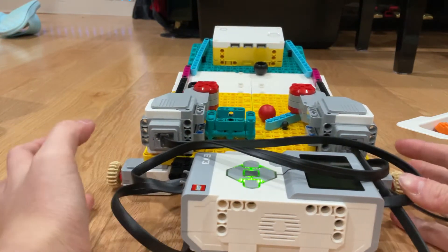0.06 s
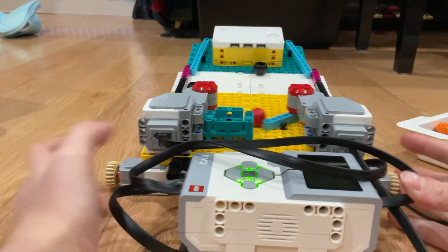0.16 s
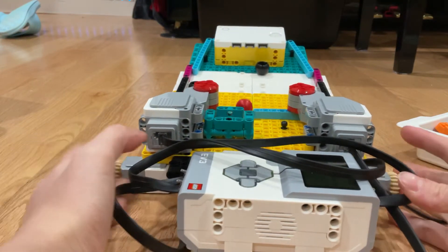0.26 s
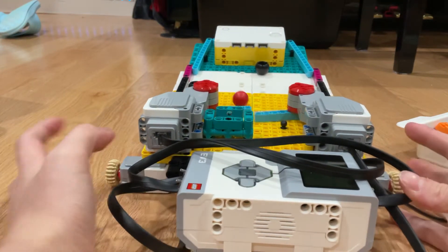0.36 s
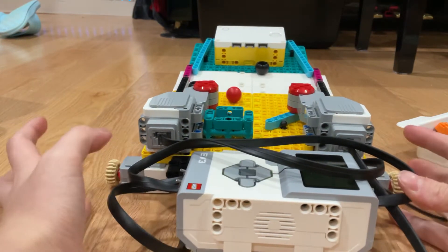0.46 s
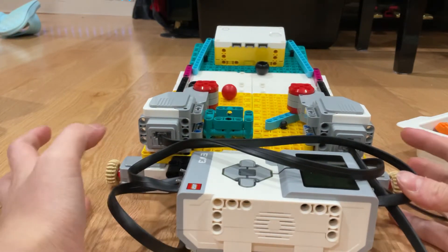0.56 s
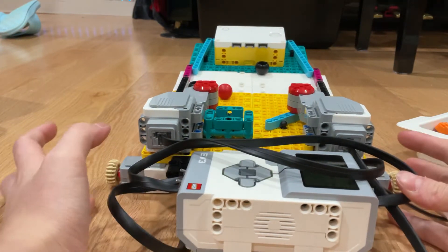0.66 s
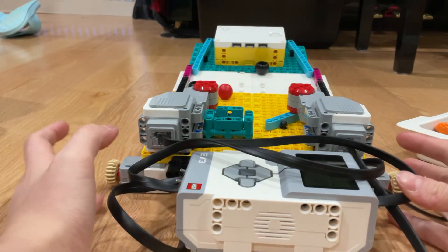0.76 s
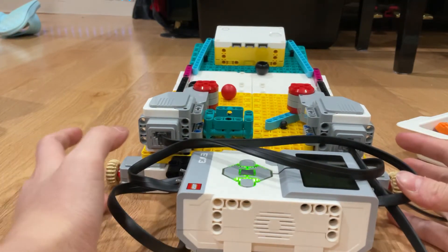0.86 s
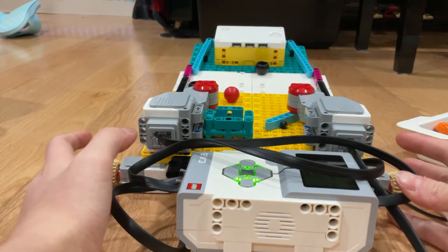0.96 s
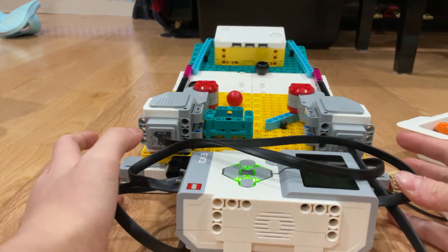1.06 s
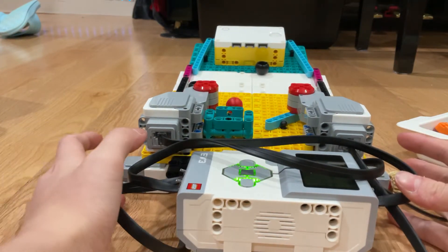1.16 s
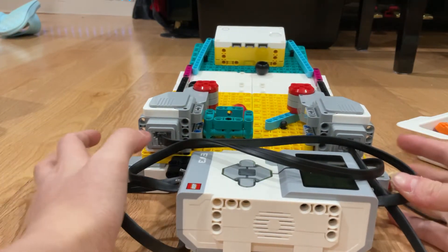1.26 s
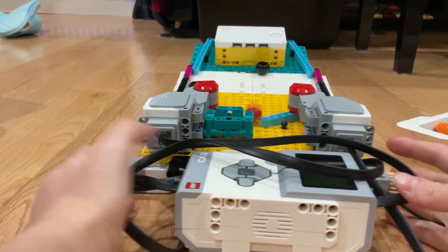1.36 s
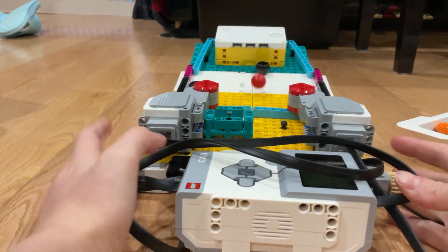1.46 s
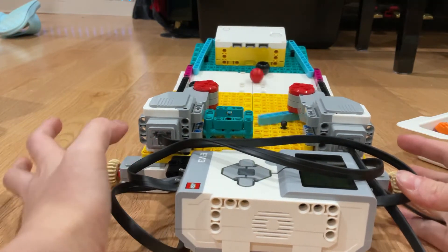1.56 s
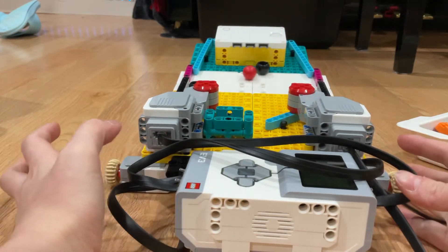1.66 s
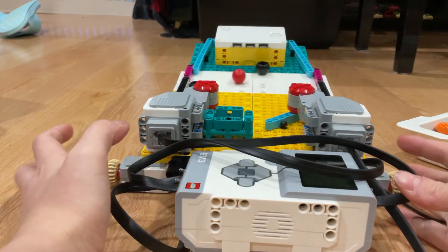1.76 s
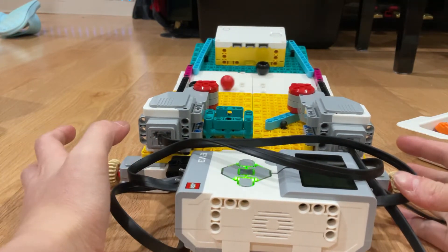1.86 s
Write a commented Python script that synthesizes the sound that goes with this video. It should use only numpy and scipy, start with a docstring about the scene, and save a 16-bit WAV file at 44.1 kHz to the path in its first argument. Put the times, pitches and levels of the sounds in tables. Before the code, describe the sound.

A motorized plastic flipper whirs and clacks on a toy pinball table. After a lull it swings again with busier clacks, then loose parts tick and the ball rolls faintly. Close microphone in a quiet room.

```python
"""A brick-built toy pinball table on a wooden floor, close to the microphone in a quiet room.
The ball rolls faintly over the studs and buttons tick. Geared motors whir as a flipper swings up and
back, clacking on the ball and its stops and thumping the floor. After a lull the ball rolls again;
at 1.3 s the flipper swings a second time, in a busier run of clacks. Last, loose parts tick and the
ball rolls on."""
import sys
import numpy as np
from scipy import signal
from scipy.fft import rfft, irfft
from scipy.io import wavfile
from scipy.ndimage import uniform_filter1d

SR = 44100
rng = np.random.default_rng(int(sys.argv[2]) if len(sys.argv) > 2 else 0)


def inscribe(sig):
    """Save sig as 16-bit PCM at rate SR to the path in sys.argv[1].

    A 1-D sig is mono; a 2-D sig holds one channel per row.
    Samples are clipped to [-1, 1] before scaling.
    """
    pcm = np.round(np.clip(np.atleast_2d(sig).T, -1, 1) * 32767)
    wavfile.write(sys.argv[1], SR, pcm.astype(np.int16))


N = 83790
SPLIT_HZ = 7200  # crossover between body and treble

# ring of the brick frame: f/Hz, level/dB, t60/s
FRAME_MODES = [(582.5, -10.5, 0.065), (950, -11, 0.058), (1220, -14, 0.11), (1616, -6.5, 0.028),
               (1736, -7.5, 0.045), (1999, -3, 0.027), (2260, 1.5, 0.025), (2920, -8, 0.02),
               (3510, 1, 0.013), (4272, 1.5, 0.014), (5150, 1, 0.012), (6060, -7.5, 0.03)]


def amp(db):
    return 10 ** (np.asarray(db) / 20)


def unit_rms(x):
    return x / np.sqrt(np.mean(x ** 2) + 1e-20)


def curve_at(points, hz):
    f, value = np.transpose(points)
    return np.interp(np.log(hz + 1), np.log(f + 1), value)


def envelope(stretches):
    """Gain over time from several stretches, silent between them."""
    t = np.arange(N) / SR
    return sum(amp(np.interp(t, *np.transpose(points), left=-140, right=-140)) for points in stretches)


def coloured(x, spectrum):
    """x through an EQ curve, at unit RMS."""
    gain = amp(curve_at(spectrum, np.fft.rfftfreq(len(x), 1 / SR)))
    return unit_rms(irfft(rfft(x) * gain, len(x)))


def clicks(n, per_s, spread_db):
    """Random clicks of either sign, a few large."""
    chance, sign, size = rng.random((n, 3)).T
    return (chance < per_s / SR) * np.sign(sign - .5) * amp(-spread_db * np.log(size + .01))


def ring(modes, lift_db=0):
    """Impulse response of dying modes (f/Hz, level/dB, t60/s) of random sign."""
    t = np.arange(3000)[:, None] / SR
    hz, db, t60 = np.transpose(modes)
    signs = rng.choice([-1, 1], len(hz))
    return (signs * amp(db + lift_db - 60 * t / t60) * np.sin(2 * np.pi * hz * t)).sum(1)


def resonate(drive, modes, lift_db=0):
    """Modes kept ringing by a drive, at unit RMS."""
    return unit_rms(signal.fftconvolve(drive, ring(modes, lift_db))[:N])


def add(mix, start_s, sound):
    part = mix[round(start_s * SR):][:len(sound)]
    part += sound[:len(part)]


def wander(x, depth_db):
    """The colour wanders: random patches of about 900 Hz by 25 ms swell and sink."""
    bands = signal.stft(x, nperseg=256)[2]
    drift = uniform_filter1d(rng.standard_normal(bands.T.shape), size=9, axis=0)
    patches = unit_rms(uniform_filter1d(drift, size=5, axis=1)).T
    return unit_rms(signal.istft(bands * amp(depth_db * patches), nperseg=256)[1][:N])


def motor():
    """Unevenly meshing gear teeth click densely: a broad hiss, a ringing housing and a thin whine."""
    # motor effort, in stretches: t/s, level/dB
    effort_curves = [
        [(0, -56.5), (.05, -66), (.125, -77)],
        [(.13, -57.5), (.165, -31.5), (.2, -35.5), (.255, -35), (.285, -44), (.31, -36), (.34, -33),
         (.435, -34), (.447, -39), (.47, -45.5), (.52, -60), (.6, -69), (.72, -76.5)],
        [(1.3, -21.5), (1.33, -43), (1.36, -31), (1.42, -33), (1.445, -43.5), (1.482, -49.5), (1.495, -33.5),
         (1.54, -29.5), (1.59, -34.5), (1.625, -39), (1.645, -70), (1.71, -61.5), (1.8, -77.5)],
    ]
    # hiss of the gears and the shaken table: f/Hz, density/dB
    gear_spectrum = [(50, -11.5), (120, -21), (300, -5.5), (700, -20), (1250, -6), (3100, -5.5), (4500, -1),
                     (8000, -2.5), (10100, -6), (13800, -4.5), (16000, -10)]
    # motor housing resonances: f/Hz, t60/s, level/dB
    housing_modes = [(1480, 0.0078, -11), (2190, 0.0055, -14), (3850, 0.0058, -7.5), (5250, .0026, -3),
                     (6130, 0.0033, -14.5), (9900, 0.0033, -7.5)]
    rattle = unit_rms(uniform_filter1d(rng.standard_normal(N), size=round(.003 * SR)))
    mesh = amp(1.9 * rattle)  # 1.9 dB of flutter, 3 ms grain
    teeth, inner_teeth = (mesh * clicks(N, per_s=4000, spread_db=1) for _ in range(2))
    housing = sum(amp(db) * resonate(inner_teeth, [(hz, 0, t60)]) for hz, t60, db in housing_modes)
    whir = wander(coloured(teeth, gear_spectrum) + housing, depth_db=2.3)
    treble = signal.sosfiltfilt(signal.butter(2, SPLIT_HZ, "high", fs=SR, output="sos"), whir)
    whine = amp(-61) * resonate(teeth, [(13280, 0, .02)])
    effort = envelope(effort_curves)
    speed = effort / amp(-34)  # 1 at full running level
    # a slowing motor loses treble first; the whine outlasts the gears
    return effort * (whir - treble + treble * speed ** .24) + whine * speed ** .68


def rolling_ball():
    """Each stud under the ball taps the playfield and rings the frame, most near 1.5 kHz."""
    # ball on the move, in stretches: t/s, level/dB
    roll_curves = [
        [(0, -65), (.05, -63), (.13, -63)],
        [(.955, -88), (.965, -62.5), (1, -66), (1.04, -73.5), (1.07, -57), (1.13, -67), (1.2, -60),
         (1.24, -56.5), (1.3, -52.5)],
        [(1.63, -56), (1.7, -71), (1.73, -53), (1.79, -55), (1.84, -57.5), (1.87, -50), (1.9, -53)],
    ]
    # playfield colour: f/Hz, density/dB
    playfield_spectrum = [(60, -15), (110, -5), (190, -14.5), (300, -1), (570, -8.5), (1500, -1.5),
                          (3500, -21.5), (8000, -36), (16000, -52.5)]
    taps = clicks(N, per_s=6000, spread_db=5)
    octaves_off = abs(np.log2(np.transpose(FRAME_MODES)[0] / 1489))
    frame = resonate(taps, FRAME_MODES, lift_db=-9 * octaves_off)
    return envelope(roll_curves) * unit_rms(coloured(taps, playfield_spectrum) + amp(-16.5) * frame)


def room_tone():
    """A faint, steady bed of air."""
    # colour of the quiet room: f/Hz, density/dB
    air_spectrum = [(15, -40), (25, -18.5), (64, 1.5), (714, -10.5), (775, -4.5), (1020, -13.5),
                    (2000, -12.5), (3080, -15), (9070, -27), (14800, -16), (16000, -24)]
    return amp(-76) * coloured(rng.standard_normal(N), air_spectrum)


def knock(db, hz, treble_db, fall_s, dull_db, focus_db, rise_s, low_cut_hz):
    """Chattering contacts ring the frame and small bricks, lifted near the struck part's pitch, hz."""
    t = np.arange(1500) / SR
    first_contact = .0022 / rise_s * (t == 0)  # harder when the rise is fast
    swell = np.where(t < rise_s, .29 + .63 * t / rise_s, np.exp((rise_s - t) / fall_s))
    chatter = (clicks(len(t), per_s=5600, spread_db=.71) + first_contact) * swell
    # other bricks ring at every blow; the smallest edges ring loudest
    brick_spread, edge_spread = (np.arange(40) + rng.random((2, 40))) / 40
    brick_modes = [(900 + (SPLIT_HZ - 900) * u, -7.5, .0079) for u in brick_spread]
    edge_modes = [(SPLIT_HZ + 9000 * u, 7.5 * u, .0077) for u in edge_spread]
    body_modes = np.vstack([FRAME_MODES, brick_modes])
    octaves = np.log2(body_modes[:, 0] / hz)
    lift_db = focus_db * np.exp(-(octaves / .5) ** 2) - dull_db * np.maximum(octaves, 0)
    snap, dry_crack = (hz, 2 * focus_db - 8, .0065), (1.3 * hz, 15, .0019)
    struck_part = ring([snap, dry_crack])
    body = signal.fftconvolve(chatter, ring(body_modes, lift_db) + struck_part)
    body = signal.sosfilt(signal.butter(2, low_cut_hz, "high", fs=SR, output="sos"), body)
    edges = signal.fftconvolve(chatter, ring(edge_modes))
    return amp(db) * (body / abs(body).max() + amp(treble_db) * edges / abs(edges).max())


def floor_thump(db):
    """The blow reaches the floorboards, lowest modes last."""
    # floorboard and base modes: f/Hz, level/dB, t60/s, rise/s
    board_modes = [(62.3, -9, 0.11, .035), (77.5, -5, .1, .025), (112, -1.5, 0.055, 0.006),
                   (132.1, -1, 0.092, 0.0084), (207, -7.5, 0.052, 0.02), (258, -4.5, 0.083, .01),
                   (324, -3.5, 0.071, 0.014), (384, 0.5, 0.073, 0.013), (561, -3.5, 0.067, 0.0057),
                   (805, -17.5, 0.088, 0.0085)]
    t = np.arange(SR // 2) / SR
    return amp(db) * sum(
        amp(mode_db - 60 * t / t60) * (1 - np.exp(-(t / rise) ** 2)) * np.sin(2 * np.pi * hz * t)
        for hz, mode_db, t60, rise in board_modes)


def ticks(mix):
    """Buttons, ball and loose parts knock lightly; a trace of each reaches the floor."""
    # light hits: t/s, level/dB, f/Hz, treble/dB, fall/s, dulling/(dB per octave), pitch focus/dB
    hits = [(.088, -34, 1910, -9, 0.0041, 11, 15.5), (0.103, -41.5, 2400, 1.5, 0.0032, 3, 5),
            (0.129, -27.5, 1790, -11, 0.0029, 2, 10), (.503, -32.5, 5150, -17.5, 0.0034, 15.5, 6),
            (.563, -39, 4800, -14.5, .0027, -5, 7.5), (0.636, -49, 4500, -26, .004, 10, 5.5),
            (.670, -54, 5000, -20, 0.0016, 6, -1), (0.988, -53.5, 1220, -38, 0.0021, 11.5, 10.5),
            (1.044, -35.5, 2000, -15, 0.0082, 3.5, 4), (1.2109, -22, 4600, -8.5, 0.0029, -5.5, 1),
            (1.218, -30, 2130, -26, 0.0035, -4, 12), (1.256, -31, 1935, -14, 0.0024, 2.5, 8),
            (1.273, -36, 8200, -11, 0.0029, 4, 11), (1.53, -20, 3480, -31, 0.0047, 17, 4.5),
            (1.678, -32, 5250, -11, 0.002, 7, 18), (1.686, -34.5, 4660, -12, .0017, 17, 13),
            (1.718, -38, 1590, -44.5, 0.017, 5.5, -1), (1.779, -37.5, 1510, -31.5, .0034, 7, 9),
            (1.843, -28, 2200, -23.5, 0.0075, 5, -7), (1.859, -30, 2490, -24, 0.0052, 7, -2),
            (1.885, -32.5, 1590, -49, 0.0069, 4.5, 5.5)]
    for start_s, db, hz, *timbre in hits:
        add(mix, start_s, knock(db, hz, *timbre, rise_s=.0007, low_cut_hz=hz / 2))
        add(mix, start_s, floor_thump(db - 32.5))


def table_bumps(mix):
    """The table rocks on the floor: a few soft, low cycles of its base each time."""
    # rocks of the base: t/s, f/Hz, level/dB
    bumps = [(.125, 370, -46.5), (.185, 69, -46), (.288, 328, -36.5), (0.353, 79, -50.5), (.505, 120, -55),
             (1.07, 109.5, -57), (1.326, 95, -37.5), (1.429, 365, -34.5), (1.505, 277, -39.5),
             (1.571, 105, -46.5), (1.70, 125, -55.5), (1.86, 121, -64)]
    cycles = 3.2
    for start_s, hz, db in bumps:
        progress = np.arange(0, 1, hz / cycles / SR)
        swell = np.sin(np.pi * progress ** .42) ** 2
        add(mix, start_s, amp(db) * swell * np.sin(2 * np.pi * cycles * progress))


def flipper_clacks(mix):
    """The flipper strikes the ball and its stops: full-bodied knocks that thump the floor."""
    # flipper hits: t/s, level/dB, f/Hz, treble/dB, fall/s, dulling/(dB per octave), pitch focus/dB,
    # rise/s, floor thump/dB
    hits = [(.167, -6.5, 2480, 0.5, 0.0024, -3.5, 11.5, 0.0056, -26.5),
            (0.301, -18.5, 1830, 2.5, 0.0034, 0, 7, 0.0014, -39.5),
            (0.438, -28, 1480, -2.9, 0.0017, 5.5, 10, 0.00033, -48.5),
            (1.2997, -7, 2260, 0.5, 0.0015, -0.5, 7.5, 0.004, -30),
            (1.346, -20, 3940, -3, .0043, 17, 8, .0011, -34),
            (1.423, -8.5, 3300, -9, 0.0078, 1, 2.5, 0.00014, -40.5),
            (1.448, -21.5, 1670, -2, 0.0032, 18, -6, 0.0012, -39),
            (1.5033, -9.5, 3070, -26, 0.0089, 7, 6.5, 0.00013, -49),
            (1.602, -18.5, 3700, -25, 0.00076, 16, 15.5, 0.0026, -52.5),
            (1.618, -27.5, 1337, -11, 0.0054, 3, 16, 0.002, -59)]
    for start_s, db, hz, *timbre, thump_db in hits:
        add(mix, start_s, knock(db, hz, *timbre, low_cut_hz=hz / 4.3))
        add(mix, start_s, floor_thump(thump_db))


def reverb(x):
    """The room answers with a noise tail whose highs die first."""
    # room decay: f/Hz, t60/s
    decay_times = [(100, 0.75), (1000, 0.68), (4000, 0.36), (16000, 0.32)]
    noise = rng.standard_normal(SR // 2) * (np.arange(SR // 2) > 300)  # 7 ms pre-delay
    hz, t, bands = signal.stft(noise, SR, nperseg=256)
    decay = amp(-60 * t / curve_at(decay_times, hz)[:, None])
    tail = signal.istft(bands * decay, SR, nperseg=256)[1]
    return signal.fftconvolve(x, tail / np.linalg.norm(tail))[:N]


def scene():
    """The table in its room, in mono."""
    mix = motor() + rolling_ball()
    flipper_clacks(mix)
    ticks(mix)
    table_bumps(mix)
    return (room_tone() + mix + amp(-13) * reverb(mix))[None]


def record(dry):
    """The microphone's bass roll-off, then the band limit."""
    thinned = signal.sosfilt(signal.butter(3, 57, "high", fs=SR, output="sos"), dry)
    band_limit = signal.firwin(511, 15750, window=("kaiser", 9), fs=SR)
    return signal.oaconvolve(thinned, band_limit[None], "same")


dry = scene()
out = record(dry)
inscribe(out)
```